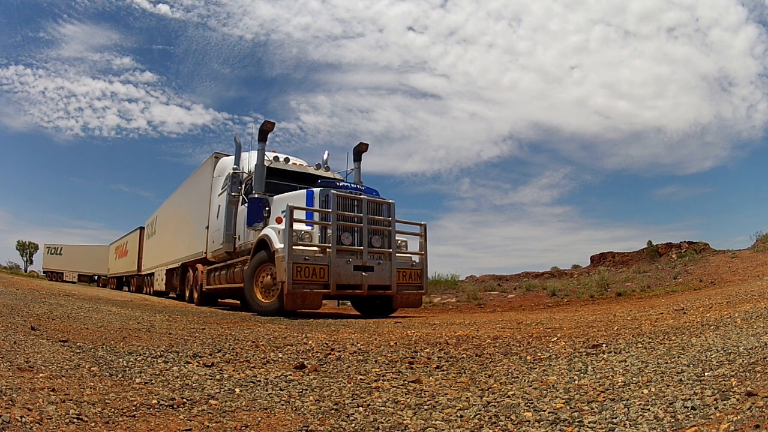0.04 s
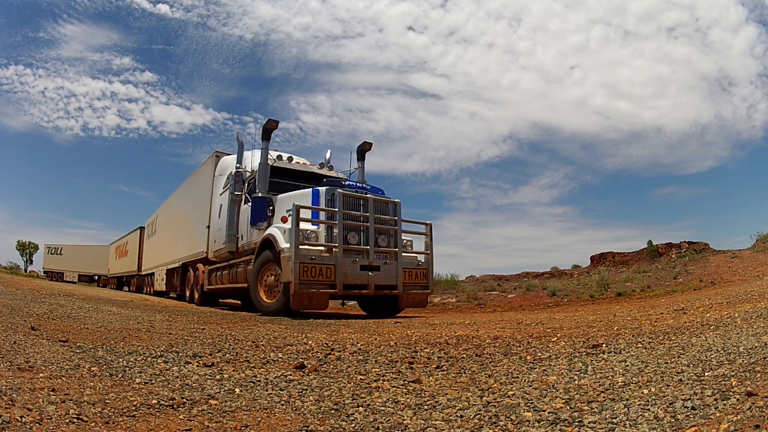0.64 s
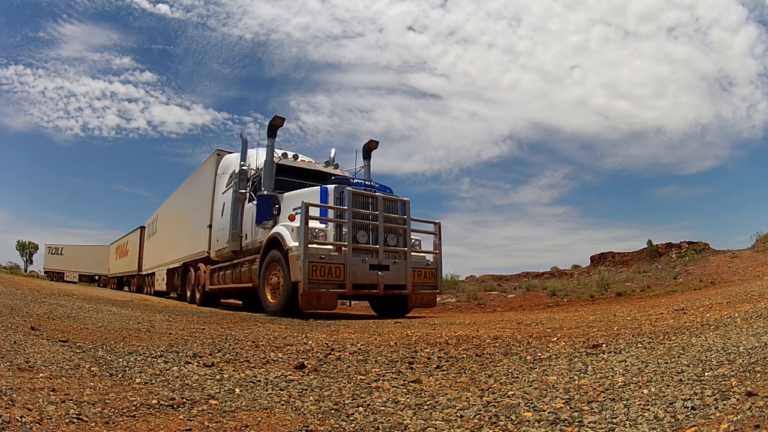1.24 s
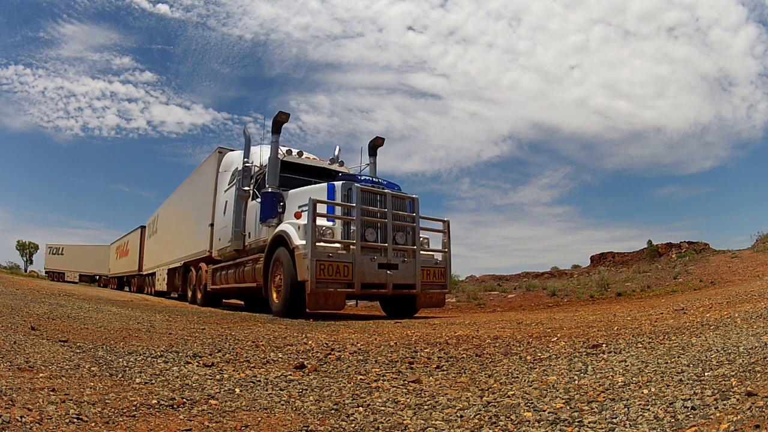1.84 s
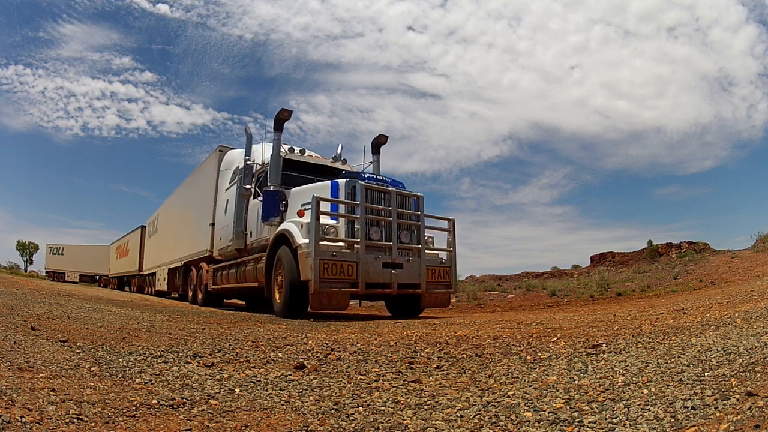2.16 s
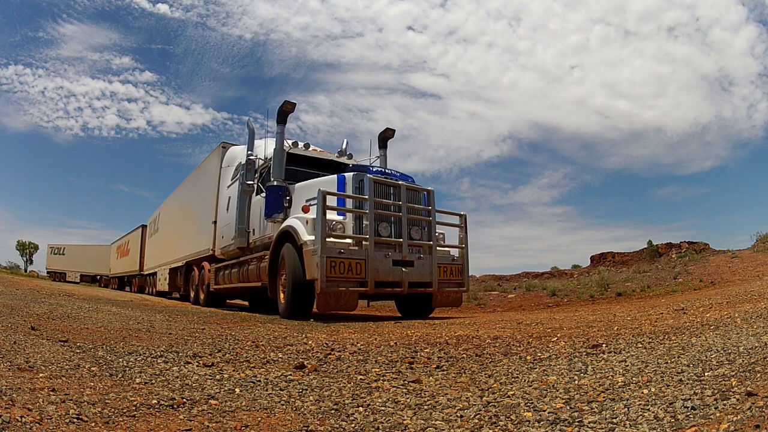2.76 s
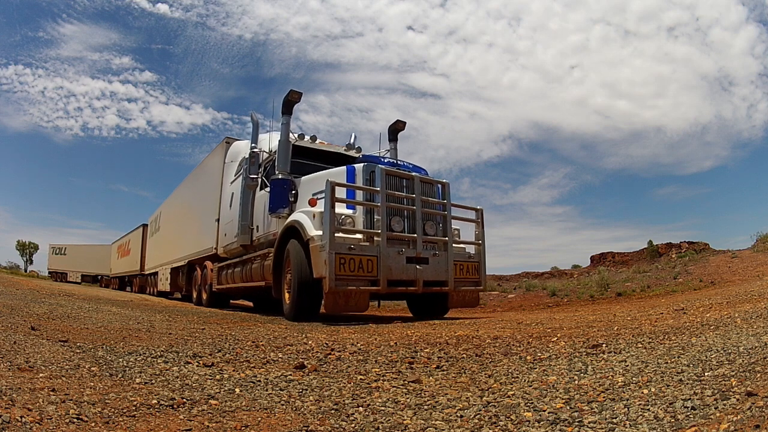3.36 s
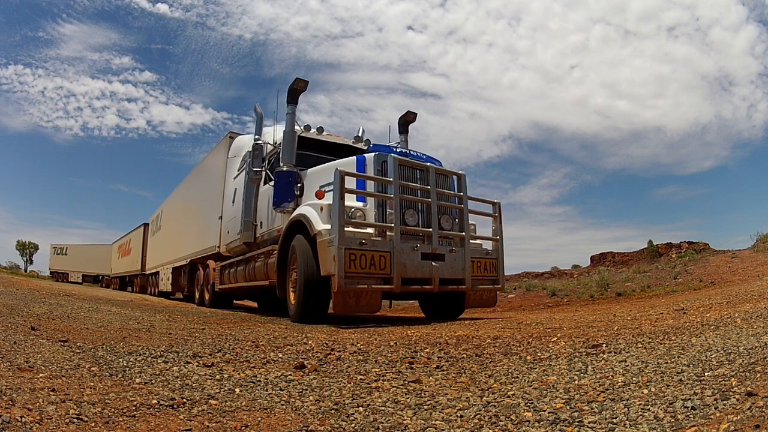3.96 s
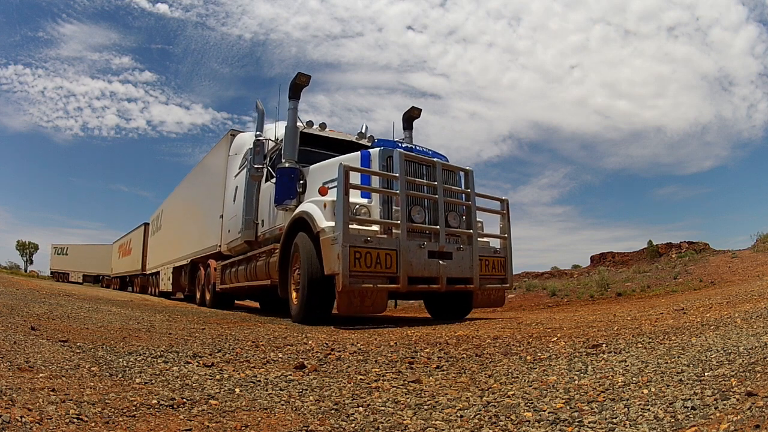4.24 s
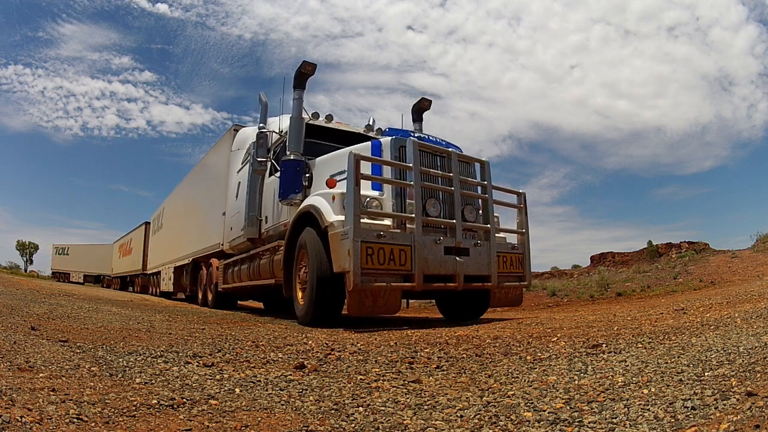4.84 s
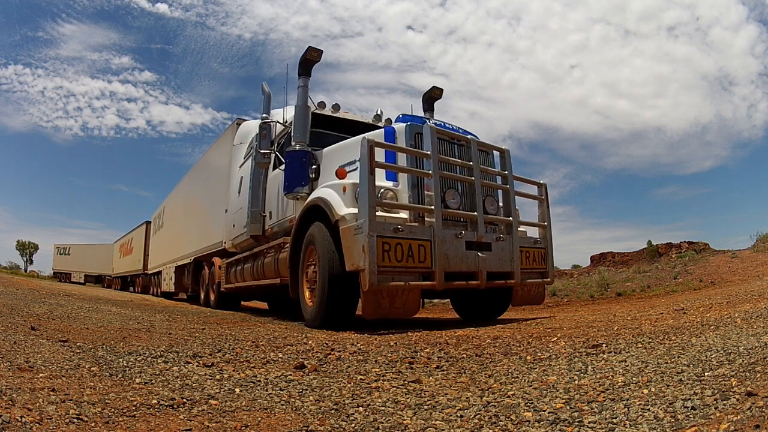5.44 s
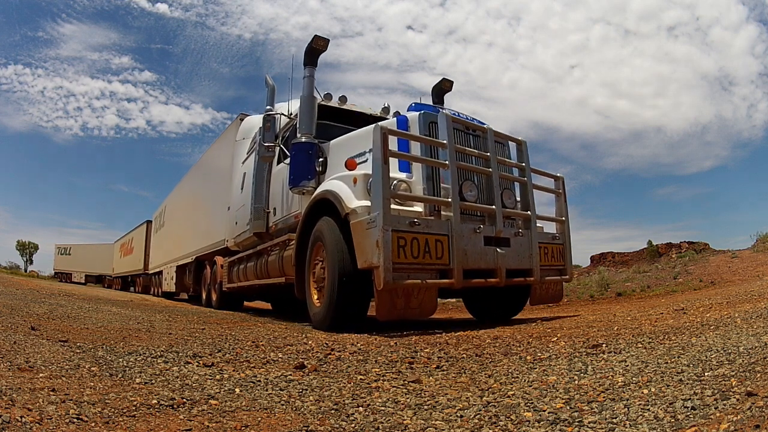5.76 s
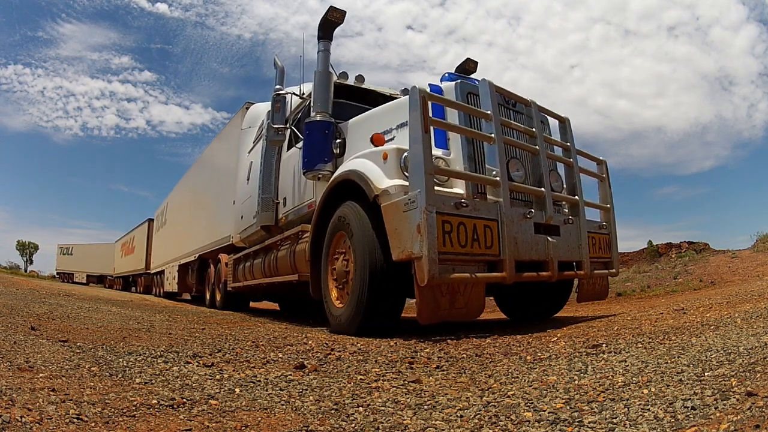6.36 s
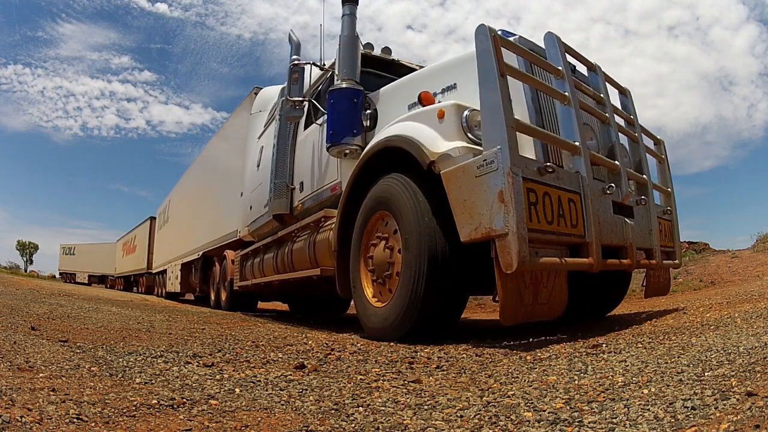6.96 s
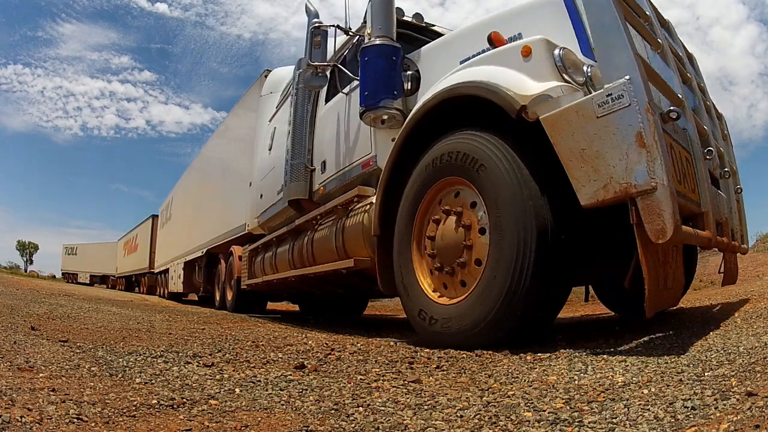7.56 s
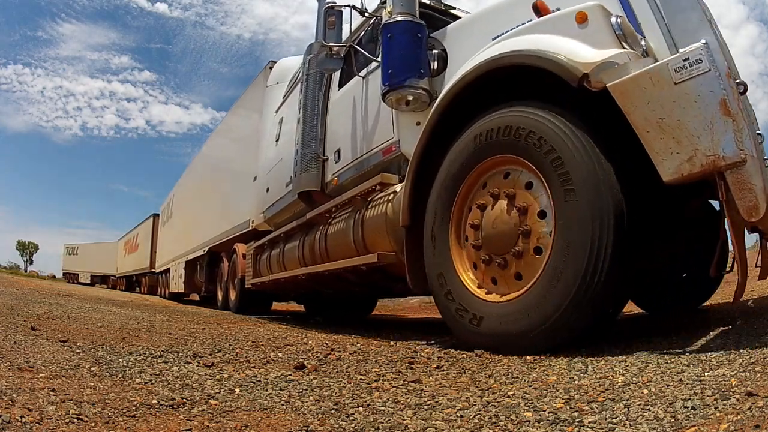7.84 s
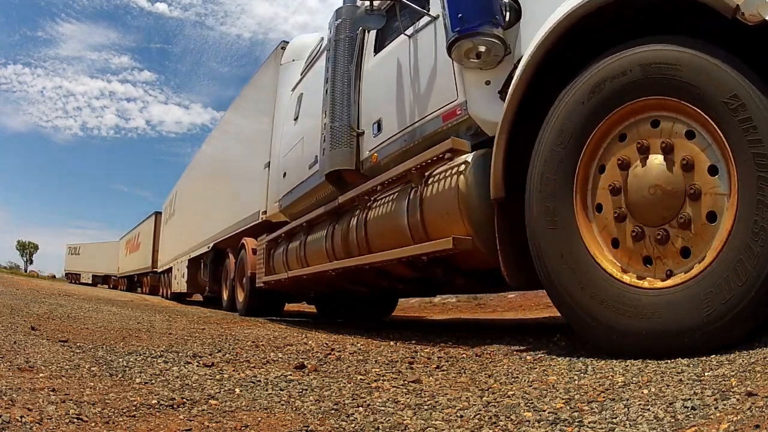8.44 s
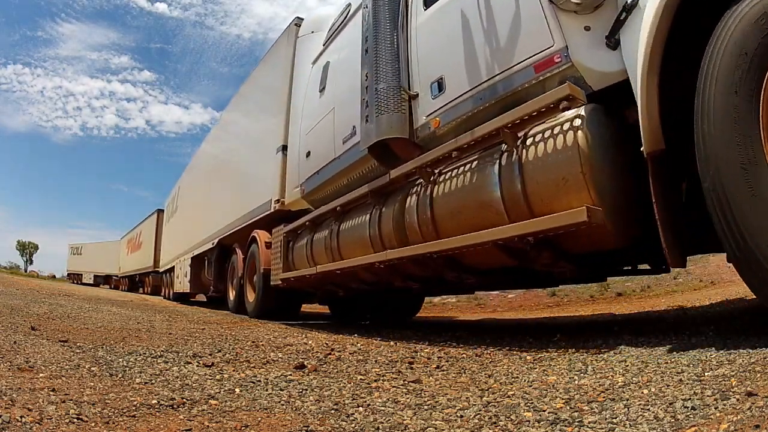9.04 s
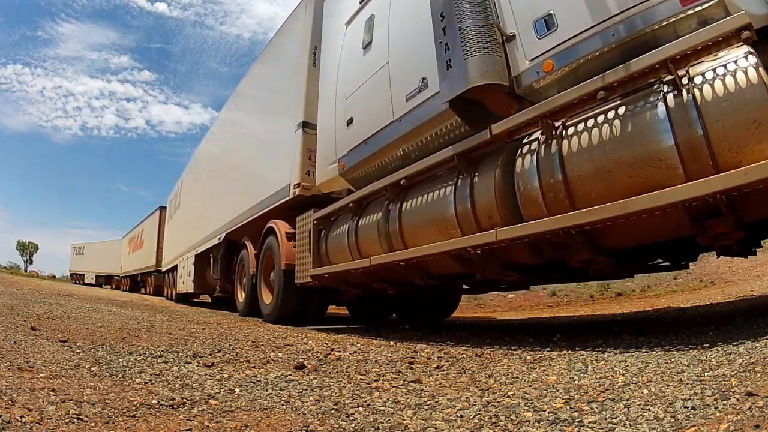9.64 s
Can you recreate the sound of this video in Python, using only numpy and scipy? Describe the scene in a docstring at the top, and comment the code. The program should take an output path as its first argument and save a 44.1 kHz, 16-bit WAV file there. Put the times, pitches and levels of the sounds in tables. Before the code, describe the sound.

A heavy diesel truck creeps along a gravel road toward a microphone near the ground. Its engine chugs at idle with a low drone and clatter, while the chassis knocks and light wind buffets the microphone. The engine revs up and grows louder, falls back for a gear change, then pulls again close alongside. Tyres and fan air hiss, fittings rattle and brakes squeak faintly, all with a gritty treble.

```python
"""A road train creeps up a gravel road from 17 m to 4 m and draws level with a microphone near the ground.
Its six-cylinder diesel idles, revs up, falls back for a gear change and pulls again: the firings drone
and growl in the exhaust and clatter in the block, while fan air and tyres hiss. Fittings rattle, the
chassis knocks, brakes and springs squeak faintly, and light wind buffets the microphone.
The recorder samples coarsely and holds each value, which mirrors the sound into a gritty treble."""
import sys
import numpy as np
from scipy import signal
from scipy.fft import rfft, irfft, next_fast_len
from scipy.io import wavfile
from scipy.ndimage import uniform_filter1d, minimum_filter1d, map_coordinates

SR = 44100
rng = np.random.default_rng(int(sys.argv[2]) if len(sys.argv) > 2 else 0)


def transcribe(signal):
    """Save signal, clipped to [-1, 1], as a 16-bit WAV file at the path in sys.argv[1]."""
    frames = np.atleast_2d(signal).T
    limited = np.clip(frames, -1, 1)
    pcm = np.round(limited * 32767).astype(np.int16)
    wavfile.write(sys.argv[1], SR, pcm)


N = 427329

# Engine speed. Each row: time in seconds, firings per second.
FIRING_RATE = [(0.0, 36.8), (0.24, 35.4), (0.75, 35.3), (0.91, 36.5), (1.38, 36.5), (1.81, 35.7),
               (2.78, 35.9), (3.37, 37.4), (3.91, 36.4), (4.64, 37.1), (5.13, 40.3), (5.91, 55.5),
               (6.04, 59.9), (6.42, 67.4), (6.88, 72.9), (7.4, 54.4), (7.5, 52.8), (8.02, 38.6),
               (8.26, 39.1), (8.66, 47.0), (9.09, 42.2), (9.47, 50.0), (9.69, 53.8)]
# The driver's foot. Each row: time in seconds, throttle (0 idle, 1 full, negative coasting).
THROTTLE = [(4.55, -0.38), (5.3, 0.78), (6.0, 0.99), (6.83, 0.5), (7.0, -0.27), (7.6, 0.16), (8.0, -0.85),
            (8.42, 0.48), (9.69, 0.98)]
# The approach. Each row: time in seconds, distance from engine to microphone in metres.
DISTANCE = [(0, 16.9), (4.3, 9.7), (5.6, 7.4), (6.1, 4.9), (6.8, 5.7), (7.9, 4.07), (9.69, 4.14)]
# Each entry: a cylinder's strength in dB, in firing order.
CYLINDER_DB = [1, -2.1, -0.12, -1.1, -1.9, -0.45]

# Loudness laws. Each lists: dB idling far off, dB per doubling of speed, dB added at full throttle,
# dB per halving of distance, dB added once the cab is alongside.
GROWL_LAW = (-22.5, 6.5, 0.5, 2, -3.5)
BOOM_LAW = (-24.5, -3, 0.5, 3, 3.5)
MUFFLER_LAW = (-40, 0, 7.5, 1.5, 14.5)
CLATTER_LAW = (-30.5, 6.5, -1, 3.5, -1)
RUSH_LAW = (-41, 4.5, 0.04, 6.5, -1)
RATTLE_LAW = (-52.5, 3.5, -0.5, 10, 0.5)
# Exhaust drone. Each row: such a law for one of the first five multiples of the firing rate.
DRONE_LAWS = [(-26.6, -5.5, 15, 0, -1), (-23, 5, 6, -2.8, -.5), (-29.7, -3, 11, 3, -2),
              (-27.3, -9, 2.5, .5, 7), (-34.5, 2, 2, 1, 1.5)]
# Resonances and hollows of the exhaust stacks. Each row: centre in Hz, half width in Hz, gain in dB.
STACK_RESONANCES = [(58, 14, 3), (72, 6, 2), (92, 7, 3.5), (105, 7, -6), (133, 7, 3), (154, 8.5, 6.5),
                    (184, 13, 4.5), (236, 16, -8)]

# Tone colours heard at the microphone. Each row: frequency in Hz, relative level in dB.
PIPE_COLOUR = [(30, -30), (60, -3.5), (95, -13.5), (140, -2), (190, 0), (250, -2.5), (340, -3.5),
               (430, -7.5), (600, -20.5), (1200, -35), (4000, -86)]
UNDERBODY_COLOUR = [(60, -15), (85, 1.5), (105, 4), (130, -1), (165, -8), (230, -16.5), (500, -48)]
MUFFLER_COLOUR = [(90, -34), (125, -6), (190, -1), (255, -2.5), (300, -11), (500, -41.5)]
BLOCK_COLOUR = [(150, -30), (320, 1.5), (400, -3), (540, 1.5), (680, -0.5), (820, -3), (1100, -6),
                (1400, -14.5), (1900, -25), (2800, -34), (4000, -39)]
RUSH_COLOUR = [(300, -31), (900, -7), (1500, 0.5), (2000, 0), (2550, 0), (3000, -5), (3400, -3.5),
               (4000, -9)]
FITTINGS_COLOUR = [(600, -27), (900, -8.5), (1150, 0.5), (1350, 1), (1600, -4), (2100, -15), (3500, -29)]
WIND_COLOUR = [(8, -28), (16, -12), (28, -2), (50, -1), (90, -8), (160, -20), (400, -45)]

# The cab shudders. Each row: middle in seconds, half length in seconds, rattle level in dB.
SHUDDERS = [(1.452, 1, -39), (2.67, 0.09, -42.5), (3.546, 0.055, -43), (8.15, 0.066, -34)]
# Gusts on the microphone. Each row: middle in seconds, half length in seconds, level in dB.
GUSTS = [(0.336, 0.33, -26), (1.1, 0.47, -26.5), (1.925, 0.13, -27), (3.4, 0.75, -25.5), (4.648, 0.28, -27),
         (8.1, .25, -36)]
# Chassis and couplings knock. Each row: start in seconds, peak level in dB.
KNOCKS = [(0.845, -12.5), (1.593, -5.5), (1.83, -10), (1.979, -10), (2.219, -7), (2.235, -8), (2.701, -19),
          (3.142, -13), (3.526, -8), (3.595, -10), (4.099, -12.5), (4.921, -15), (5.923, -12), (8.084, -6),
          (8.108, -9), (8.15, -15)]
# The chassis rings. Each row: frequency in Hz, bandwidth in Hz, relative level in dB.
CHASSIS_MODES = [(503, 120, 3), (780, 140, 10), (1010, 220, 10), (1390, 280, 2), (2200, 520, -28)]
# Brakes and springs. Each row: middle in seconds, half length in seconds, pitch in Hz, level in dB.
SQUEAKS = [(2.65, .38, 1812, -47), (8.54, .05, 2635, -40), (8.73, .12, 1262, -38), (9.11, .09, 1250, -37)]
# The recorder's filters. Each row: frequency in Hz, gain in dB.
INPUT_FILTER = [(3300, 0.5), (3600, -1.5), (3800, -5), (3950, -10), (4050, -30), (4200, -100)]
OUTPUT_FILTER = [(8000, -0.5), (12500, 2), (13800, 0), (14600, -5), (15400, -13)]

IDLE_HZ, FAR_M = 36, 16  # "idling far off" in the loudness laws
PASS_S, PASS_EASE_S = 8.3, 0.33  # the cab's flank hides the grille and bares the muffler
SHUDDER_CLATTER_DB, SHUDDER_RUSH_DB = 10, -6  # relative to a shudder's rattle level
BREEZE_DB = -30
HOLD_HZ, TOP_HZ = 8000, 15400  # the recorder's sampling rate and treble cutoff


def amp(db):
    """Decibels to gain."""
    return 10 ** (np.asarray(db) / 20)


def unit(x):
    """x at rms 1."""
    return x / np.sqrt(np.mean(x ** 2) + 1e-20)


def colour(points, hz):
    """Gain of (Hz, dB) points joined on a log axis."""
    point_hz, db = np.transpose(points)
    return amp(np.interp(np.log(hz + 1), np.log(point_hz + 1), db))


def curve(rows):
    """(seconds, value) rows joined into one value per sample."""
    return np.interp(np.arange(N) / SR, *np.transpose(rows))


def wobble(rate):
    """A smooth random curve, rate knots a second."""
    knots = rng.standard_normal(int(N * rate / SR) + 4)
    return map_coordinates(knots, [np.arange(N) * rate / SR])


def swell(middle_s, half_s):
    """A flat-topped rise and fall round a moment."""
    return np.exp(-((np.arange(N) / SR - middle_s) / half_s) ** 4)


def filtered(x, response):
    """x through a gain that depends on frequency."""
    size = next_fast_len(N + SR // 2)
    return irfft(rfft(x, size) * response(np.fft.rfftfreq(size, 1 / SR)), size)[:N]


def shaped(x, points):
    """x coloured by a spectrum, at rms 1."""
    return unit(filtered(x, lambda hz: colour(points, hz)))


def loudness(law, drive):
    """A part's gain follows speed, throttle, distance and which side of the cab faces the microphone."""
    idle_db, speed_db, throttle_db, near_db, alongside_db = law
    speed, throttle, metres, alongside = drive
    effort_db = speed_db * np.log2(speed / IDLE_HZ) + throttle_db * throttle
    place_db = near_db * np.log2(FAR_M / metres) + alongside_db * alongside
    return amp(idle_db + effort_db + place_db)


def drone(firings, drive):
    """The stacks hum on multiples of the firing rate, each swelling as it meets a pipe resonance."""
    # unequal cylinders beat against the upper multiples and roughen them
    lope = .2 * np.sin(np.pi * firings + .5 * wobble(3)) + .12 * np.sin(2 * np.pi * firings / 3)
    speed, hum = drive[0], np.zeros(N)
    for k, law in enumerate(DRONE_LAWS, 1):
        pipe_db = sum(db * np.exp(-((k * speed - hz) / width) ** 2) for hz, width, db in STACK_RESONANCES)
        cycles = k * (firings + .004 * wobble(9)) + rng.random()
        level = loudness(law, drive) * amp(pipe_db + 0.55 * wobble(13)) * (1 + (k > 2) * lope)
        hum += level * np.sqrt(2) * np.sin(2 * np.pi * cycles)
    return hum


def puffs(cycles, decay, floor, scatter_db):
    """Noise bursts once a cycle over a steady floor; decay is in cycles, and the cylinders differ."""
    index = cycles.astype(int)
    scatter = scatter_db * rng.standard_normal(2 ** 11)[index]
    strength = amp(np.take(CYLINDER_DB, index, mode="wrap") + scatter)
    return (floor + strength * np.exp(-(cycles % 1) / decay)) * rng.standard_normal(N)


def growl(firings, drive):
    """Turbulent gas puffs growl in the pipes, boom under the cab and throb in the muffler's shell."""
    pipes = shaped(puffs(firings, decay=1.0, floor=1.7, scatter_db=2.5), PIPE_COLOUR)
    boom = shaped(puffs(firings, decay=0.89, floor=0.26, scatter_db=3.5), UNDERBODY_COLOUR)
    shell = shaped(puffs(firings, decay=0.34, floor=0.4, scatter_db=1.5), MUFFLER_COLOUR)
    return (loudness(GROWL_LAW, drive) * pipes
            + loudness(BOOM_LAW, drive) * boom
            + loudness(MUFFLER_LAW, drive) * shell)


def panels(x, t60_s=.25, wet_db=-14):
    """Many closely spaced sheet-metal modes ring on faintly after x."""
    t = np.arange(SR // 4) / SR
    tail = rng.standard_normal(len(t)) * amp(-60 * t / t60_s)
    return x + amp(wet_db) * signal.fftconvolve(x, tail / np.linalg.norm(tail))[:N]


def clatter(firings, drive, shudder):
    """Combustion and valve gear rattle the engine block; loose fittings shake it unevenly."""
    combustion = unit(puffs(firings, decay=0.13, floor=1.9, scatter_db=0))
    valves = unit(puffs(3 * firings + .3, decay=0.55, floor=0.67, scatter_db=4.5))
    shake = amp(0.57 * wobble(16) + 0.73 * wobble(45))
    level = np.hypot(loudness(CLATTER_LAW, drive), amp(SHUDDER_CLATTER_DB) * shudder)
    return level * shaped(panels(shake * (combustion + valves)), BLOCK_COLOUR)


def rush(firings, drive, shudder, stones_per_s=900):
    """Fan air and tyres on gravel hiss, with injector ticks and dense crunching stones."""
    air = unit(puffs(firings + 0.14, decay=0.14, floor=4.5, scatter_db=7))
    stones = (rng.random(N) < stones_per_s / SR) * rng.uniform(-1, 1, N)
    level = np.hypot(loudness(RUSH_LAW, drive), amp(SHUDDER_RUSH_DB) * shudder)
    return level * amp(0.7 * wobble(18)) * shaped(panels(air + 0.38 * unit(stones)), RUSH_COLOUR)


def resonance(hz, centre_hz, width_hz):
    """Gain of a tone as it glides through a resonance."""
    return 1 / np.hypot(1, (hz - centre_hz) / width_hz)


def fan_and_gear(firings, speed):
    """Fan blades and a timing gear whine with the crankshaft, each loudest at its housing's resonance."""
    blades, teeth = 3.57, 38 / 3  # passes per firing
    shroud = resonance(blades * speed, centre_hz=264, width_hz=22)
    cover = resonance(teeth * speed, centre_hz=485, width_hz=75)
    fan = amp(-15 + 1.4 * wobble(5.4)) * np.sin(2 * np.pi * (blades * firings + 0.069 * wobble(6.7)))
    gear = amp(-31 + 1.6 * wobble(8)) * np.sin(2 * np.pi * (teeth * firings + 0.14 * wobble(22)))
    return shroud * fan + cover * gear


def rattle(drive, shudder):
    """Loose steel fittings chatter in quick, uneven bursts, harder while the cab shudders."""
    bursts = amp(3.5 * wobble(110) + 0.48 * wobble(21))
    chatter = shaped(bursts * rng.standard_normal(N), FITTINGS_COLOUR)
    return (loudness(RATTLE_LAW, drive) + shudder) * chatter


def wind():
    """A light breeze and a few gusts buffet the microphone."""
    strength = amp(BREEZE_DB) + sum(amp(db) * swell(s, half) for s, half, db in GUSTS)
    flutter = amp(1.5 * wobble(7))
    return strength * flutter * shaped(rng.standard_normal(N), WIND_COLOUR)


def knocks(buzz_t60_s=0.016):
    """Short, cushioned blows ring the heavily damped chassis and leave a brief buzz."""
    blows, t = np.zeros(N + SR), np.arange(SR // 20) / SR
    ring = sum(amp(db) * np.exp(-np.pi * width * t) * np.sin(2 * np.pi * hz * t)
               for hz, width, db in CHASSIS_MODES)
    contact = np.hanning(18)  # a 0.4 ms push
    ring = np.convolve(ring, contact)[:len(t)]
    for start_s, db in KNOCKS:
        buzz = 0.028 * rng.standard_normal(len(t)) * amp(-60 * t / buzz_t60_s)
        hit = ring + signal.fftconvolve(ring, buzz)[:len(t)]
        blows[round(start_s * SR):][:len(t)] += amp(db) * hit / np.abs(hit).max()
    return blows[:N]


def squeaks():
    """Brakes and springs give thin, slightly unsteady squeals that swell and fade."""
    t = np.arange(N) / SR
    waver = 0.18 * wobble(35)
    return sum(amp(db) * swell(s, half) * np.sin(2 * np.pi * (hz * t + waver))
               for s, half, hz, db in SQUEAKS)


def scene():
    """From the roadside: every part of the engine follows one crankshaft, throttle and approach."""
    speed = curve(FIRING_RATE)
    alongside = .5 + .5 * np.tanh((np.arange(N) / SR - PASS_S) / PASS_EASE_S)
    drive = (speed, curve(THROTTLE), curve(DISTANCE), alongside)
    firings = np.cumsum(speed) / SR
    shudder = sum(amp(db) * swell(s, half) for s, half, db in SHUDDERS)
    exhaust = drone(firings, drive) + growl(firings, drive)
    machinery = clatter(firings, drive, shudder) + rush(firings, drive, shudder)
    whine = fan_and_gear(firings, speed)
    return (exhaust + machinery + whine + rattle(drive, shudder) + knocks() + squeaks() + wind())[None]


def limiter(x, ceiling=.96, window_samples=180):
    """The gain dips smoothly for a few milliseconds round each peak near full scale."""
    needed = np.minimum(1, ceiling / (np.abs(x) + 1e-9))
    return x * uniform_filter1d(minimum_filter1d(needed, window_samples), window_samples)


def record(dry):
    """One microphone, a narrow input, a limiter; held samples mirror the sound about their rate."""
    narrow = limiter(filtered(dry[0], lambda hz: colour(INPUT_FILTER, hz)))
    clock = 2 * np.pi * HOLD_HZ * np.arange(N) / SR
    mirrored = narrow * (1 + 2 * np.cos(clock) + 2 * np.cos(2 * clock))
    # holding each value makes the treble droop as a sinc
    held = filtered(mirrored, lambda hz: np.sinc(hz / HOLD_HZ) * colour(OUTPUT_FILTER, hz) * (hz < TOP_HZ))
    return held[None]


dry = scene()
out = record(dry)
transcribe(out)
```